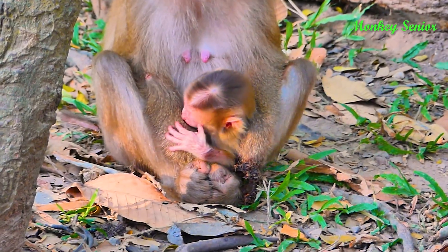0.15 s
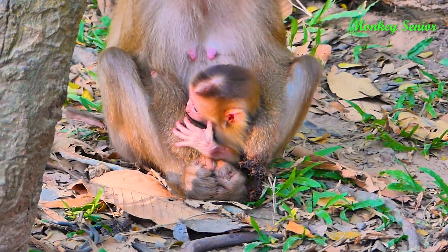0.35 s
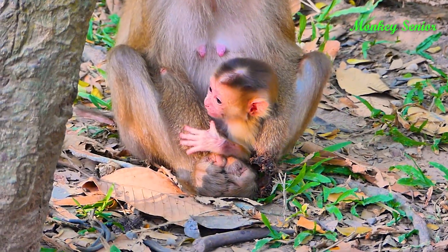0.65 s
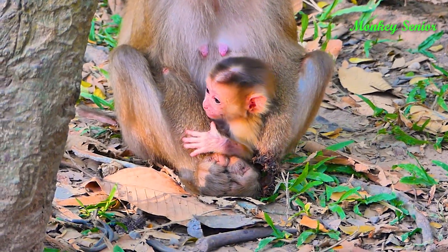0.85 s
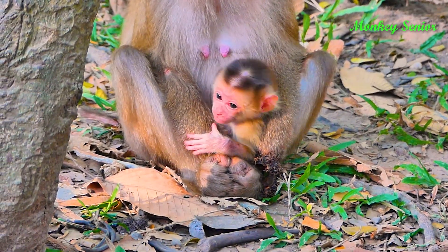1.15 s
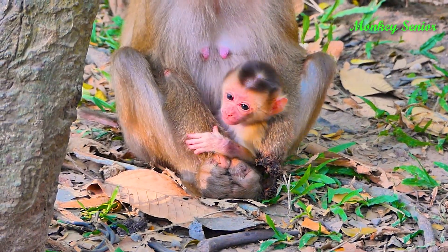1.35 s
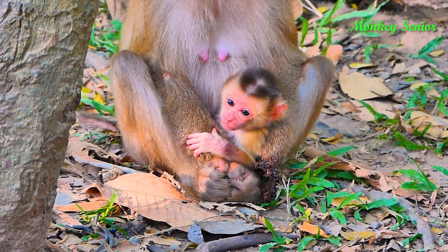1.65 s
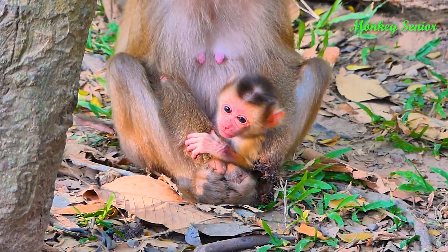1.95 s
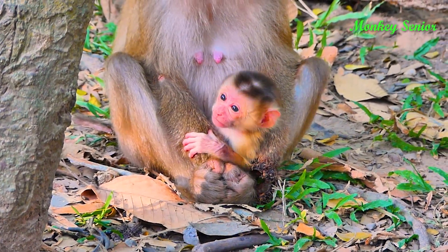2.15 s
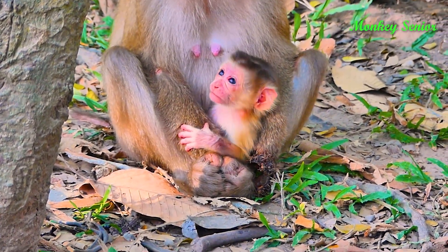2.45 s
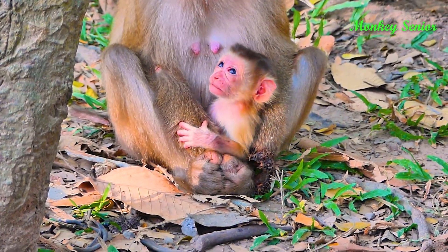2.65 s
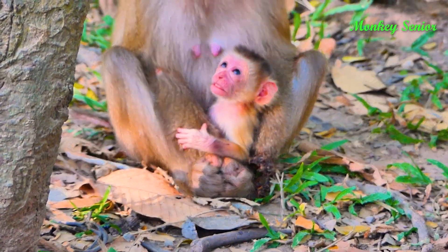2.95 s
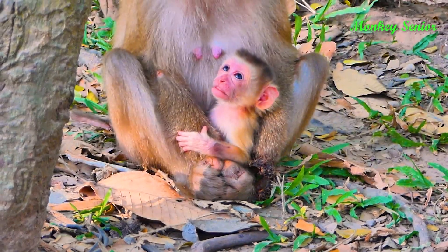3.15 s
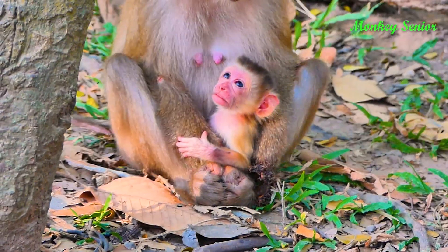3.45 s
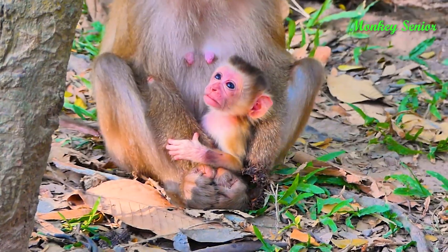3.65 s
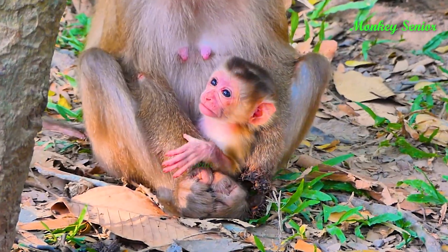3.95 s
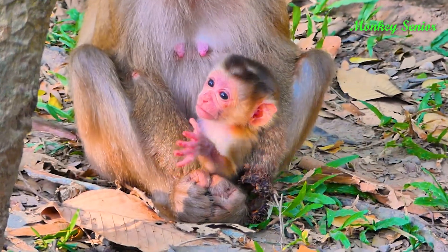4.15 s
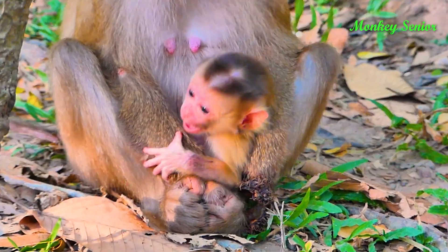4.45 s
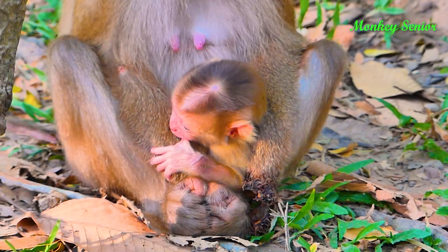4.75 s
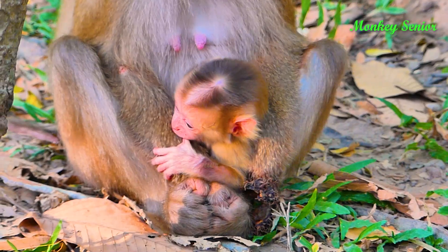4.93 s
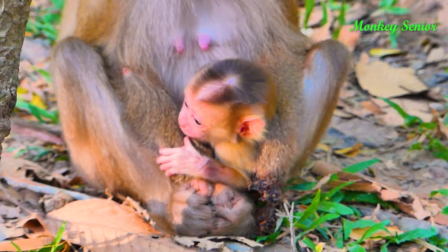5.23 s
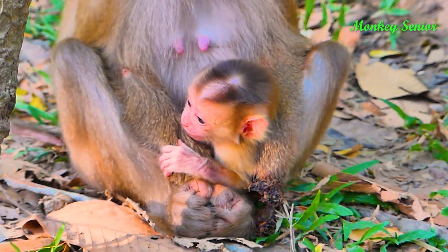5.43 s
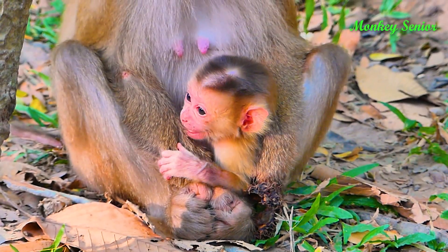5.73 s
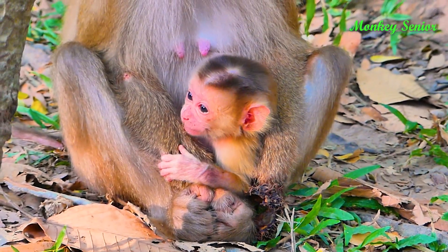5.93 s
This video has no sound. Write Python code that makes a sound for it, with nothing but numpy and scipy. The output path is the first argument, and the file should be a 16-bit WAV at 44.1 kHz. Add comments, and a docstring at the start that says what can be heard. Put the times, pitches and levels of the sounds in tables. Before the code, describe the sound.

A hoarse bird call drops to a lower note, then faint whistles and five shrill squeaks ring out over insect ticking and a thin forest drone.

```python
"""A forest floor by day. A hoarse bird call, a harsh whistle under hissing rasp, steps down to a lower note
among far sliding notes; thin wavering whistles follow. From 3.6 s come five shrill squeaks, short harsh
whistles that ring on as scattered echoes, and the hoarse call starts again at the end. All along, an insect
ticks in bouts of paired falling chirps, dry leaves snap as dying noise bursts and soft low bumps swell,
over a flickering insect drone, low rumble and airy hiss, all made of filtered noise."""
import sys
import numpy as np
from scipy import signal
from scipy.fft import rfft, irfft
from scipy.io import wavfile

SR = 44100
rng = np.random.default_rng(int(sys.argv[2]) if len(sys.argv) > 2 else 0)


def int16_out(signal):
    """Quantize to a 16-bit WAV file."""
    q = np.round(np.clip(np.atleast_2d(signal).T, -1, 1) * 32767)
    wavfile.write(sys.argv[1], SR, q.astype(np.int16))


N = 268569
TIME = np.arange(N) / SR
BINS_HZ = np.maximum(np.arange(N // 2 + 1) * SR / N, 1)

# Levels in the tables are relative: each source sets its own final balance.
# Syllables of the hoarse call: start_s, length_s, pitch_hz, whistle_db, rasp_db
HOARSE_SYLLABLES = [(-.035, .245, 3452, -34.5, -37), (0.228, 0.097, 3356, -38.5, -49.5),
                    (6.03, .12, 3420, -42, -56)]
# Spectrum of the hoarse call's rasp: frequency_hz, level_db
HOARSE_RASP = [(2800, -30), (4100, -7), (4800, -2), (5700, -4), (6220, 3), (6600, 0), (7450, -4), (7900, 0),
               (8600, 2.5), (9600, 0), (9900, -25), (12000, -40)]
# Shrill squeaks: start_s, length_s, pitch_hz, pitch_shake_hz, level_db, rasp_db, hiss_db, echo_db, echo_t60_s
SQUEAKS = [(3.601, 0.045, 6640, 561, -28.5, -14, -14.5, -3.5, 1.3),
           (3.778, 0.045, 6700, 640, -26.5, -18, -10.5, -8, 1),
           (3.988, 0.042, 6120, 830, -32.5, -7.5, -14, -3.5, 0.87),
           (4.259, 0.046, 6757, 660, -24.5, -23.5, -16.5, -5.5, 0.95),
           (4.571, 0.077, 6510, 508, -34, -12.5, -18, -5.5, 0.57)]
# Spectrum of the low rasp in a squeak: frequency_hz, level_db
SQUEAK_RASP = [(3500, -22), (4650, -25.5), (4870, 2), (5170, -7), (5500, 3), (5850, -1), (6500, -5),
               (7500, -35)]
# Spectrum of the high hiss in a squeak: frequency_hz, level_db
SQUEAK_HISS = [(6000, -27), (7000, 7), (7620, 6), (7900, -3), (8150, -1), (8600, -4.5), (9570, -3.5),
               (9850, -24), (15000, -24)]
# Sliding notes of far birds: start_s, length_s, pitch_hz, glide_hz_per_s, pitch_shake_hz, level_db,
# right_minus_left_db
GLIDING_NOTES = [(0.088, .12, 4840, -4700, 443, -46, 0), (.26, 0.2, 2950, -2500, 300, -56.5, -5),
                 (0.456, .215, 2190, -650, 237, -50, -5), (2.237, 0.11, 5110, 7000, 798, -54, .3)]
# Faint far whistles: start_s, length_s, pitch_hz, level_db
FAR_WHISTLES = [(1.081, .16, 3550, -64), (1.31, 0.21, 3530, -61), (1.95, 0.39, 3490, -64.5),
                (2.25, 0.26, 3510, -67), (2.38, 0.45, 3180, -64), (2.65, 0.54, 3450, -70),
                (2.7, 0.42, 2860, -70)]
# Bouts of insect ticking: first_chirp_s, pairs_per_s, pair_count, level_db
INSECT_BOUTS = [(.1335, 22.36, 12, -46.5), (1.632, 21.7, 6, -49), (2.518, 22.3, 6, -48),
                (2.786, 23.3, 11, -46.7), (4.905, 21.85, 6, -48.5), (5.176, 22.65, 7, -46)]
# Leaf snaps: start_s, level_db, centre_hz, t60_s
LEAF_SNAPS = [(1.084, -48, 3020, .03), (1.09, -54, 1900, 0.19), (1.095, -58.5, 6900, 0.25),
              (1.3844, -58.5, 7000, .1), (3.7964, -51, 8000, 0.014), (4.1745, -34, 6540, .012),
              (5.465, -56, 8800, 0.22)]
# Soft low bumps: start_s, length_s, pitch_hz, level_db
LOW_BUMPS = [(1.51, .07, 160, -49.5), (1.81, .15, 68, -53), (4.17, 0.076, 160, -48.5)]
# Loudness curve of the insect drone: time_s, level_db
DRONE_LEVEL = [(0.6, -62.5), (1.06, -65.5), (2.98, -59.5), (3.32, -64.5), (4.01, -61.5), (4.62, -62.5),
               (6.09, -62)]
# Spectrum of the open air: frequency_hz, level_db
AIR_SPECTRUM = [(240, -53), (400, -6), (446, 0.5), (512, -6), (607, -3.5), (1790, -12), (2290, -13.5),
                (3470, -14), (3810, -16.5), (4730, -11.5), (5350, -16.5), (6950, -19.5), (7750, -22.5),
                (15000, -18.5), (16000, -29)]
# Spectrum of the distant rumble: frequency_hz, level_db
RUMBLE_SPECTRUM = [(20, -52), (40, -23), (62, -13), (90, -2.5), (125, 1.5), (160, -2), (200, -9.5),
                   (260, -12.5), (370, -13), (480, -27.5), (800, -43)]
# Stereo width of the background: frequency_hz, side_minus_mid_db
BACKGROUND_WIDTH = [(60, 4), (110, -14.5), (200, 6), (380, 5.5), (700, 2.5), (1290, 0), (2380, -2),
                    (4400, -7.5), (8120, -6.5), (15000, -3)]


def from_db(db):
    """Decibels to gain."""
    return 10 ** (np.asarray(db) / 20)


def rms_one(x):
    """Scale to unit power."""
    return x / np.sqrt(np.mean(x ** 2) + 1e-20)


def colour(x, points):
    """Filter by a smooth spectrum of (Hz, dB) points, joined on a log frequency axis."""
    hz, db = np.transpose(points)
    curve_db = np.interp(np.log(BINS_HZ), np.log(hz), db)
    return irfft(rfft(x) * from_db(curve_db), N)


def noise(points):
    """Unit noise with a given spectrum."""
    return rms_one(colour(rng.standard_normal(N), points))


def band(centre_hz, width_hz):
    """Unit noise in a bell-shaped band; at 0 Hz it is a random wobble."""
    bell = np.exp(-.5 * ((BINS_HZ - centre_hz) / width_hz) ** 2)
    return rms_one(irfft(rfft(rng.standard_normal(N)) * bell, N))


def pan(x, right_db):
    """Lean a sound to one side by a level difference, right minus left."""
    return x * from_db(np.array([[-.5], [.5]]) * right_db)


def whistle(pitch_hz, shake_hz, shake_rate_hz):
    """A tone whose pitch swings quickly and unevenly between two limits, which makes it harsh."""
    uneven_rate_hz = shake_rate_hz * (1 + .4 * band(0, 60))
    swing = np.sin(2 * np.pi * np.cumsum(uneven_rate_hz) / SR)
    zigzag = np.arcsin(swing) * 2 / np.pi
    phase = 2 * np.pi * np.cumsum(pitch_hz + shake_hz * zigzag) / SR
    return np.sqrt(2) * np.sin(phase)


def glide(start_s, length_s, pitch_hz, hz_per_s):
    """Pitch slides evenly while a note is held."""
    return pitch_hz + hz_per_s * np.clip(TIME - start_s, 0, length_s)


def envelope(start_s, length_s, attack_s, sag_db_per_s, release_db_per_s):
    """A note swells, weakens at a steady sag while it lasts, then dies away faster by the release."""
    age_s = np.maximum(TIME - start_s, 0)
    attack = np.minimum(age_s / attack_s, 1)
    loss_db = sag_db_per_s * age_s + release_db_per_s * np.maximum(age_s - length_s, 0)
    return attack * from_db(-loss_db)


def swells(rows, width_hz):
    """Narrow bands of noise that rise and fall once each."""
    out = np.zeros(N)
    for start_s, length_s, pitch_hz, level_db in rows:
        arch = np.sin(np.pi * np.clip((TIME - start_s) / length_s, 0, 1))
        out += from_db(level_db) * arch * band(pitch_hz, width_hz)
    return out


def trees(x, t60_s, spread):
    """Countless small echoes from trunks and leaves, a little different in each ear; keeps the energy."""
    fade = from_db(-60 * TIME[:SR] / t60_s)  # echoes last one second at most
    mid, side = rng.standard_normal((2, SR)) * fade / np.sqrt(np.sum(fade ** 2))
    ears = np.array([mid + spread * side, mid - spread * side])
    return signal.fftconvolve(x[None], ears, axes=1)[:, :N]


def distant(x, t60_s, spread):
    """A sustained sound that arrives only as scattered echoes; unit power."""
    return rms_one(trees(x, t60_s, spread))


def hoarse_calls(attack_s=0.034, sag_hz_per_s=250, rasp_spread=0.37, flutter_db=0.5):
    """A harsh, slightly sinking whistle with a hissing rasp that mostly lies above it."""
    out = np.zeros((2, N))
    for start_s, length_s, pitch_hz, whistle_db, rasp_db in HOARSE_SYLLABLES:
        sinking_hz = glide(start_s, length_s, pitch_hz, -sag_hz_per_s)
        tone = distant(whistle(sinking_hz, shake_hz=336, shake_rate_hz=55), t60_s=0.27, spread=0.31)
        tone = tone * envelope(start_s, length_s, attack_s, sag_db_per_s=34, release_db_per_s=240)

        side = rasp_spread * noise(HOARSE_RASP) * [[1], [-1]]
        rasp = rms_one(noise(HOARSE_RASP) + side) * from_db(flutter_db * band(0, 70))
        rasp = rasp * envelope(start_s, length_s, attack_s, sag_db_per_s=27, release_db_per_s=92)
        out += pan(from_db(whistle_db) * tone, right_db=-3.0) + from_db(rasp_db) * rasp
    return out


def squeaks(shake_rate_hz=95, edge_s=0.0069, scatter=0.66, right_db=-5.0):
    """Each squeak is a short harsh whistle with rasp and hiss, followed by its long echo among the trees."""
    out = np.zeros((2, N))
    for start_s, length_s, pitch_hz, shake_hz, level_db, rasp_db, hiss_db, echo_db, echo_t60_s in SQUEAKS:
        gate = np.clip(np.minimum(TIME - start_s, start_s + length_s - TIME) / edge_s, 0, 1)
        tone = whistle(pitch_hz, shake_hz, shake_rate_hz)
        rasp = from_db(rasp_db) * noise(SQUEAK_RASP)
        hiss = from_db(hiss_db) * noise(SQUEAK_HISS)
        call = gate * (tone + rasp + hiss)
        # straight path and nearby leaves
        near = rms_one(.5 * call + scatter * trees(call, t60_s=0.039, spread=.15)) * call.std()
        far = distant(call, echo_t60_s, spread=0.27) * call.std()
        out += from_db(level_db) * (from_db(-4.5) * pan(near, right_db) + from_db(echo_db + 6) * far)
    return out


def gliding_notes(echo_db=-8.5, echo_t60_s=1.6):
    """Harsh sliding notes from deep among the trees, each with a faint long echo."""
    out = np.zeros((2, N))
    for start_s, length_s, pitch_hz, hz_per_s, shake_hz, level_db, right_db in GLIDING_NOTES:
        sliding_hz = glide(start_s, length_s, pitch_hz, hz_per_s)
        tone = distant(whistle(sliding_hz, shake_hz, shake_rate_hz=70), t60_s=.2, spread=.42)
        shape = envelope(start_s, length_s, attack_s=0.078, sag_db_per_s=0, release_db_per_s=230)
        out += pan(from_db(level_db) * shape * tone, right_db)
    return out + from_db(echo_db) * trees(out.mean(axis=0), echo_t60_s, spread=0.44)


def far_whistles():
    """Thin wavering whistles of far birds: narrow noise bands, smeared by the forest."""
    waver = from_db(2.5 * band(0, 13))
    return trees(swells(FAR_WHISTLES, width_hz=58) * waver, t60_s=0.081, spread=0.39)


def ticking_insect(pair_gap_s=.0135, chirp_s=.0021, middle_hz=4850, fall_hz_per_s=48000, first_db=-4.5,
                   swell_db=2.5, swell_s=0.078):
    """Two wing strokes in each cycle; every stroke is a brief tone that drops in pitch."""
    out = np.zeros(N)
    t = np.arange(-400, 400) / SR
    bell = np.exp(-.5 * (t / chirp_s) ** 2)
    for first_chirp_s, pairs_per_s, pair_count, level_db in INSECT_BOUTS:
        for k in range(int(round(pair_count))):
            # a bout starts softer and soon reaches full strength
            soft_db = swell_db * np.exp(-k / pairs_per_s / swell_s)
            for lag_s, stroke_db in ((0, first_db), (pair_gap_s, 0)):
                size, tune = rng.standard_normal(2)  # no two strokes are quite alike
                at = int((first_chirp_s + k / pairs_per_s + lag_s) * SR) - len(t) // 2
                phase = 2 * np.pi * ((middle_hz + 45 * tune) * t - fall_hz_per_s * t ** 2 / 2)
                gain = from_db(level_db + stroke_db - soft_db + 0.56 * size)
                out[at:at + len(t)] += gain * bell * np.sin(phase)
    return pan(out, right_db=6.5) * from_db(0.5) + from_db(-24) * trees(out, t60_s=.3, spread=.6)


def leaf_snaps():
    """Dry leaves crack in short, quickly dying bursts of band noise."""
    out = np.zeros(N)
    for start_s, level_db, centre_hz, t60_s in LEAF_SNAPS:
        decay_db = level_db - 60 * np.abs(TIME - start_s) / t60_s
        out += (TIME >= start_s) * from_db(decay_db) * band(centre_hz, centre_hz / 5)
    return out


def low_bumps():
    """Soft low bumps: narrow bands of deep noise that swell once each."""
    return swells(LOW_BUMPS, width_hz=12)


def insect_drone(gain_db=-3.5):
    """Many far insects of the same kind merge into one flickering band."""
    time_s, level_db = np.transpose(DRONE_LEVEL)
    level_db = np.interp(TIME, time_s, level_db)
    chorus = np.array([band(4650, 250) * from_db(3.7 * band(0, 55)) for ear in range(2)])
    return from_db(level_db + gain_db) * (chorus + 0.52 * chorus[::-1])  # each ear also hears the other side


def background(air_db=-54, rumble_db=-52.5):
    """Distant rumble and the hiss of open air as shaped noise, wide in the low middle."""
    mid, side = [from_db(air_db) * noise(AIR_SPECTRUM) + from_db(rumble_db) * noise(RUMBLE_SPECTRUM)
                 for part in range(2)]
    return pan(mid + colour(side, BACKGROUND_WIDTH) * [[1], [-1]], right_db=-0.7)


def scene():
    """Callers, insects, leaves and bumps over the background."""
    calls = hoarse_calls() + squeaks() + gliding_notes() + far_whistles()
    return calls + ticking_insect() + leaf_snaps() + low_bumps() + insect_drone() + background()


def record(dry, cutoff_hz=15850):
    """The top is cut steeply, filtered forwards and backwards so that nothing is delayed."""
    lowpass = signal.ellip(10, .05, 60, cutoff_hz, fs=SR, output="sos")
    return signal.sosfiltfilt(lowpass, dry)


dry = scene()
out = record(dry)
int16_out(out)
```